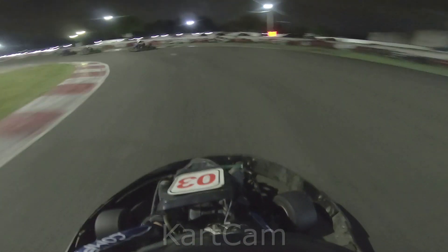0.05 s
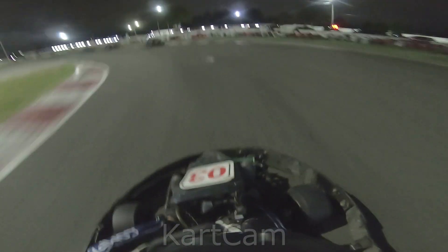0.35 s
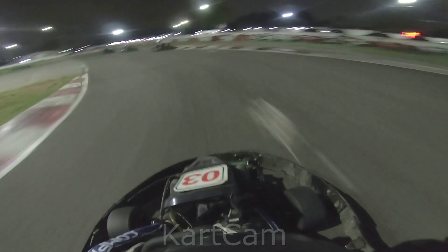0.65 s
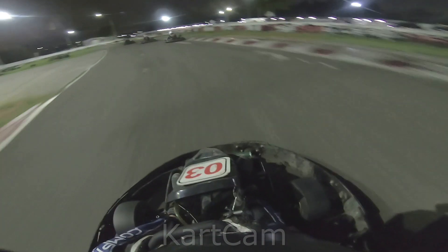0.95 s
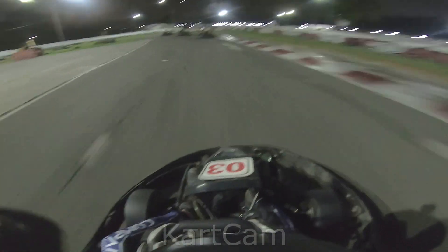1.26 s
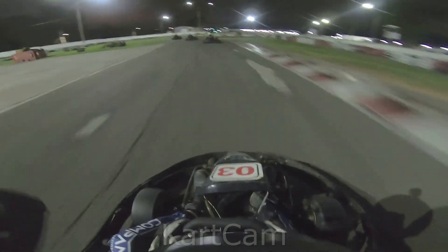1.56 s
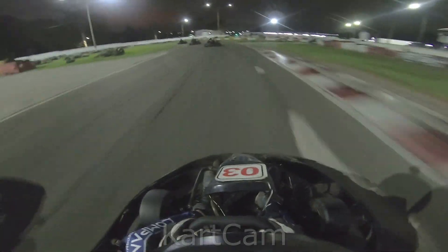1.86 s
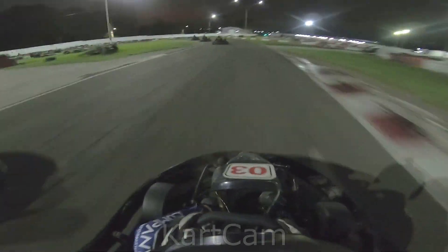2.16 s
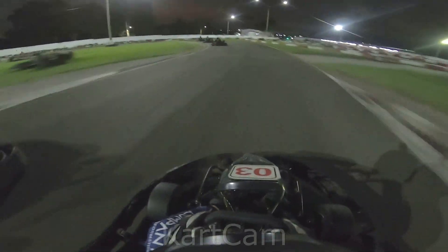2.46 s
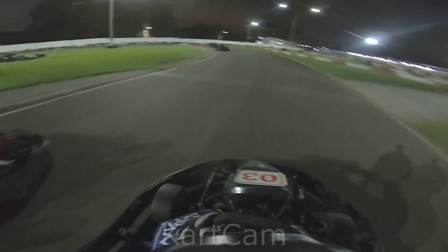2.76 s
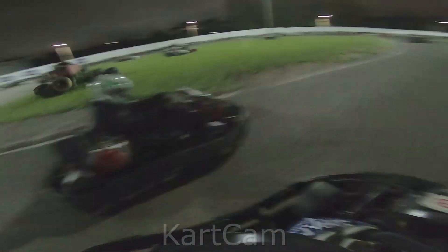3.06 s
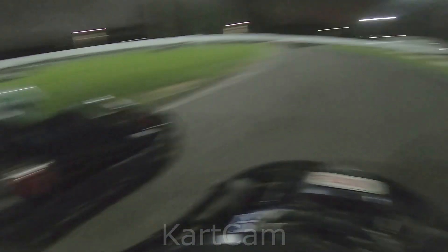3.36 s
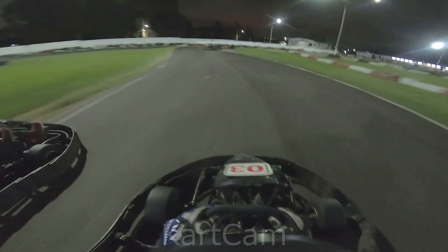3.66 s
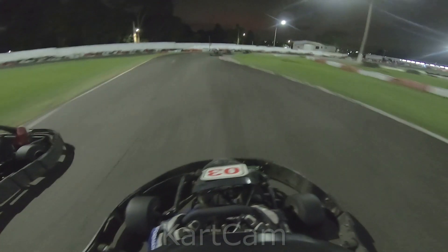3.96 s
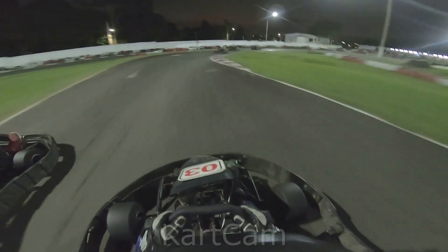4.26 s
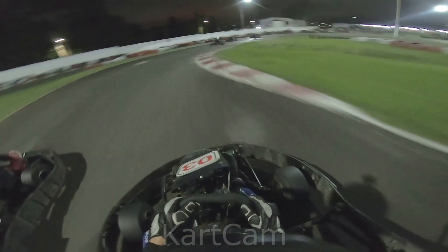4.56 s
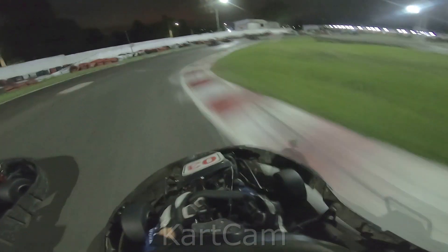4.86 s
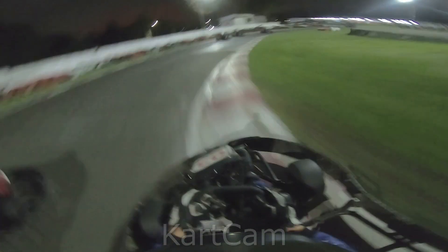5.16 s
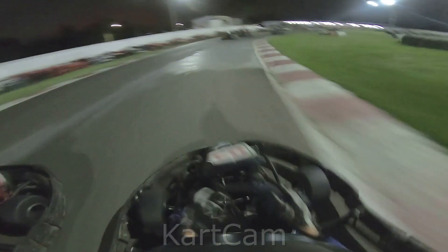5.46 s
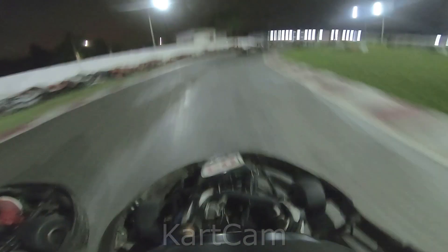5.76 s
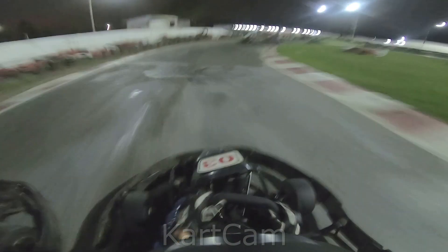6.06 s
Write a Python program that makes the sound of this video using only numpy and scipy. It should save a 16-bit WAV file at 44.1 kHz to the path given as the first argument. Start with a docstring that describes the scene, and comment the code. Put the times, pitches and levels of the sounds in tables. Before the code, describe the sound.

A go-kart's single-cylinder engine thuds and clinks at speed, slowly rising in pitch, with chain whirr and gusty wind buffeting the microphone.

```python
"""Go-kart accelerating, heard from the helmet

A four-stroke single thuds and clinks once in two crank turns round an outdoor track.
Chain and tyres whirr; the chain scrapes on its sprocket. Gusts buffet and rasp on the camera case.
Low hums swell and throb. The wind turns dull while the driver looks aside, baring the engine."""
import sys
import numpy as np
from scipy import signal
from scipy.fft import rfft, irfft
from scipy.io import wavfile
from scipy.ndimage import uniform_filter1d

SR = 44100
rng = np.random.default_rng(int(sys.argv[2]) if len(sys.argv) > 2 else 0)


def unload_audio(sound):
    """Save the sound as a 16-bit wav file, at the path given as the first command line argument."""
    columns = np.transpose(np.atleast_2d(sound))
    # keep every value between -1 and 1, then stretch to whole-number steps
    steps = np.round(np.clip(columns, -1, 1) * 32767)
    wavfile.write(sys.argv[1], SR, steps.astype(np.int16))


N = 269010
T = np.arange(N) / SR
CRUISE_HZ = 55.4  # crank rate
MAIN_RING_HZ, CASE_CUTOFF_HZ = 3100, 6150

# engine speed (time [s], crank rate [Hz])
CRANK_SPEED = [(0, 49.9), (.678, 50.65), (1.235, 50.96), (1.738, 53.21), (3.894, 61.62), (4.174, 62.0),
               (4.905, 65.2), (6.1, 67.16)]
# exhaust note (multiple of firing rate [-], relative level [dB])
EXHAUST_ORDERS = [(1, -11), (2, 0.5), (3, -7), (4, -5.5), (5, -3), (6, -7), (7, -13), (8, -11.5),
                  (9, -13.5), (10, -18.5), (11, -16), (12, -15.5), (13, -21.5), (14, -18.5), (15, -18.5),
                  (16, -22.5), (17, -16)]
# clatter at the helmet (time [s], level [dB], brightness [dB/oct])
CLATTER_AT_HELMET = [(0.1, -45, -6), (.33, -41, -9.5), (.65, -47, -12.5), (1.3, -41.5, -7), (1.55, -40, -8),
                     (2.15, -39.5, -9.5), (2.5, -44.5, -9.5), (2.9, -41.5, 0), (3.45, -40, 11),
                     (3.8, -43, 12), (4.15, -42.5, 8.5), (6.1, -43, 6)]
# valve and piston blows (place in cycle [0-1], relative level at cruise [dB],
# growth up to cruise [dB/oct], rattle decay [s], brightness [dB/oct])
CYCLE_BLOWS = [(.2, -8.5, 30, .003, 7), (.49, -1, -6, .003, 0), (.535, -2.5, -6, .003, -3),
               (.63, -7, 15, .002, 4), (.68, -4.5, 28, .003, -4)]
# modes of cylinder fins and covers (nominal frequency [Hz], width [Hz], gain [dB])
FIN_MODES = [(1130, 110, -12.5), (1850, 150, -3), (2040, 160, -9.5), (2600, 400, -2.5), (3070, 230, 18.5),
             (3310, 310, -6), (3950, 220, 5.5), (4550, 330, -8.5), (5530, 160, -2), (5880, 92, -5.5)]
# sinking ring of the clatter (time [s], pitch factor [-])
FIN_PITCH = [(1.7, 1.045), (2.7, 1.0)]
# hard knocks (time [s], level [dB], main ring [Hz], brightness [dB/oct])
HARD_KNOCKS = [(.019, -43, 3160, -1), (.06, -37, 3170, -3), (0.14, -38, 3120, -4), (.182, -35, 3350, -6),
               (0.219, -31.5, 3200, -8), (.259, -34, 3000, 0), (.458, -32.5, 3250, -2),
               (.774, -33, 3050, -7), (.976, -36, 3180, 0), (1.169, -37, 3140, 1), (1.517, -35, 3130, -8),
               (1.557, -34, 3300, -5), (1.595, -34.5, 3180, -10), (1.672, -33.5, 3120, -6),
               (1.746, -35.5, 3300, -8), (1.857, -34, 3180, -9), (2.043, -34.5, 3060, -6),
               (2.19, -34.5, 3140, -9), (2.226, -34, 3060, -7), (2.37, -39, 3020, -5),
               (2.513, -36, 3110, -5), (2.654, -37.5, 3050, -5), (2.69, -37, 3100, -3),
               (2.796, -34.5, 3120, 7), (2.866, -34, 3040, 0), (2.899, -35, 3000, -9),
               (3.002, -36.5, 3060, 4), (3.038, -40, 3020, 3), (3.14, -38, 3280, -3), (3.174, -36, 3080, 1),
               (3.309, -37, 3050, -1), (3.412, -35.5, 3070, -6), (3.443, -39, 3100, 12),
               (3.476, -35, 3080, -1), (3.543, -35, 3060, 8)]
# chain and tyre whirr (time [s], level [dB])
WHIRR_LEVEL = [(0, -33), (1.3, -33.5), (1.5, -33), (2.2, -33.5), (2.75, -36), (3.1, -36.5), (3.42, -34.5),
               (3.8, -33.5), (4.18, -35), (4.32, -28.5), (6.1, -35.5)]
# running gear and wind spectra (frequency [Hz], relative density [dB])
GEAR_SPECTRUM = [(200, 2.5), (600, -2), (1200, 7.5), (1900, 4), (2400, 2.5), (3500, 0.5), (4000, 1.5),
                 (4450, -5.5), (5000, -2.5), (5900, -11.5), (6500, -19.5), (7100, -27), (8500, -29.5),
                 (10000, -41), (11500, -62.5)]
BUFFET_SPECTRUM = [(10, -27), (25, -9.5), (45, 2), (65, 0.5), (90, 3.5), (125, 0.5), (160, -7), (260, -40),
                   (600, -65.5), (2000, -100)]
FLUTTER_SPECTRUM = [(10, -20), (32, 2.5), (65, -4.5), (130, -3), (180, 3.5), (240, -2.5), (330, -11),
                    (500, -21.5), (1200, -58), (3000, -100)]
ROAR_SPECTRUM = [(120, -30), (280, -1.5), (400, -3.5), (600, -4.5), (900, -7.5), (1400, -11.5),
                 (1900, -14.5), (2400, -20), (3200, -24), (4500, -27.5), (6000, -35), (7500, -67.5),
                 (11000, -81)]
HISS_SPECTRUM = [(900, -7.5), (1800, 2), (2700, -5), (3400, -9), (3900, -0.5), (4550, -3.5), (5200, -9),
                 (5800, -15.5), (6400, -32.5), (7000, -34), (8400, -37), (10000, -50), (11500, -53)]
# air over the case, bright head-on, dull aside (time [s], cutoff [Hz], gain [dB], extra hiss [dB])
CASE_AIRFLOW = [(0, 4910, -0.1, -0.5), (1.33, 5800, 1.6, -0.5), (1.48, 3070, -1.5, 1),
                (1.66, 2320, -2.5, 6), (1.95, 1670, 1.3, -1), (2.22, 1404, 2, 3), (2.46, 1363, -1.6, 11),
                (2.6, 742, 2, 6), (2.85, 710, -5, -9), (3.05, 758, 5.5, 6), (3.5, 1020, 0, -2),
                (3.88, 1850, -2.5, -11), (3.905, 2730, 0.5, -7), (4.22, 2870, 0, 6), (4.31, 2970, 2, 7.5),
                (4.46, 3980, 2, 1.5), (4.56, 7400, 0.8, 1.5), (5.55, 7900, 1.26, 1), (5.75, 7000, -3.5, 3),
                (6.1, 7240, 1, 2.5)]
# gusts, lulls if negative (time [s], length [s], buffet [dB], flutter [dB], rush [dB], cutoff rise [oct])
GUSTS = [(0.086, 0.071, 5, -3, 2.5, -0.087), (0.318, .25, -3.5, 1.5, 0.5, -0.26),
         (0.856, 0.15, 0.5, -0.5, -1, -0.13), (1.051, .09, -5, -4, 1, 0.052),
         (1.645, 0.062, -2, -1, 6, -0.27), (1.773, 0.035, -12, 2, 2.5, 0.32),
         (1.844, 0.046, -1, -4, -2.5, 0.69), (1.88, 0.034, 1, -4, 5, -0.14),
         (1.995, 0.05, -3, 2, -1.5, -0.64), (2.047, 0.023, -6, -14, 1, 0.38),
         (2.077, 0.026, -4, -1, 0, -.5), (2.109, 0.024, -5, -1, 1, 0.75), (2.16, 0.032, -7, -2, 0.5, 0.11),
         (2.189, .014, -2, -3, 1.5, -0.2), (2.253, 0.018, 6.5, 1.5, 3.5, 0.99),
         (2.287, 0.059, -8, -1, 0.5, 0.52), (2.369, 0.012, 4, 10, 6, .1), (2.413, 0.016, 4, 3, 5, -0.09),
         (2.459, .022, 4, 0, 4, 0.062), (2.499, 0.021, -2, 2, 2.5, .35), (2.711, 0.028, 1, 6, 11, 0.45),
         (2.865, 0.19, -4, -4, 6.5, 0.99), (3.018, 0.042, 0, 9, -1, -0.077),
         (3.143, 0.084, 1, -3, -0.5, -0.23), (3.4, 0.26, -3.5, -1.5, -0.5, -0.11),
         (3.734, 0.084, -8, 5.5, 3, 0.18), (3.856, 0.051, -9, 2, -2, -0.11),
         (3.926, 0.057, -1.5, -8, 3.5, 0.042), (4.034, 0.051, 0, -4, 0, 0.042),
         (4.144, 0.069, -3, 0.5, 3, -0.16), (4.331, 0.17, 1, 0, -1, -0.042),
         (4.516, 0.079, -1, 8.5, 0, -0.053), (4.814, 0.09, -14, 3, -1, 0), (5.047, 0.07, -5, 4, 0.5, 0.097),
         (5.2, 0.074, -3, 7.5, 0.5, 0), (5.51, 0.11, 1.5, 7, .5, 0), (5.714, 0.5, 0, -6.5, 2, 0.21),
         (5.977, 0.065, -26, 7.5, -4, -0.048)]
# chain on sprocket (time [s], length [s], frequency [Hz], level [dB])
CHAIN_SCRAPES = [(.69, .05, 4130, -41), (1.05, .05, 4300, -33), (1.482, 0.023, 4000, -33),
                 (2.35, .06, 4030, -42), (2.55, 0.3, 4400, -47.5), (2.78, 0.092, 4200, -49),
                 (3.1, .3, 4380, -44.5), (3.35, .2, 4470, -44), (3.45, .15, 4100, -42)]
# brief low hums of engine and wind (time [s], length [s], frequency [Hz], level [dB])
LOW_DRONES = [(.86, .2, 129, -21), (1.02, .12, 137, -19), (1.1, .13, 119, -20), (1.66, .12, 176, -17),
              (1.73, .14, 208, -20.5), (2.03, .17, 81, -17), (2.3, .16, 55, -20), (2.48, .16, 78.5, -18.5),
              (3.03, 0.091, 91.7, -15.5), (3.04, .09, 185.5, -23.5), (3.17, .1, 125, -19.5),
              (3.76, .3, 152.3, -20.5), (3.88, 0.24, 91, -20.5), (4.0, .1, 206, -26), (4.17, .14, 143, -22),
              (4.3, 0.16, 219, -23), (4.52, 0.17, 242, -26.5), (4.94, .14, 203, -27),
              (5.04, 0.13, 133.4, -18), (5.33, 0.098, 87, -21), (5.63, .16, 71, -16),
              (5.68, .14, 188, -29.5), (5.83, 0.16, 101, -20)]


def gain(db):
    """Decibels to amplitude."""
    return 10 ** (np.asarray(db) / 20)


def unit_rms(x):
    """Scale to rms 1."""
    return x / np.sqrt(np.mean(x ** 2) + 1e-20)


def curves(rows):
    """Table columns interpolated over time."""
    times_s, *columns = np.transpose(rows)
    return [np.interp(T, times_s, column) for column in columns]


def noise(spectrum):
    """Shaped noise, rms 1."""
    hz, db = np.transpose(spectrum)
    shape_db = np.interp(np.log(np.fft.rfftfreq(N, 1 / SR) + 1), np.log(hz), db)
    return unit_rms(irfft(rfft(rng.standard_normal(N)) * gain(shape_db), N))


def wander(rate_hz):
    """Random drift up to rate_hz, rms 1."""
    size = 2 ** 13
    hz = np.fft.rfftfreq(size, T[-1] / size)
    drift = irfft(rfft(rng.standard_normal(size)) / np.sqrt(1 + (hz / rate_hz) ** 6))
    return unit_rms(np.interp(T, np.linspace(0, T[-1], size), drift))


def steady(x, span_s):
    """Hold the running rms near 1."""
    size = max(int(span_s * SR), 8)
    return x / np.sqrt(uniform_filter1d(uniform_filter1d(x ** 2, size), size) + 1e-9)


def lowpass(x, cutoff_hz, order):
    """Zero-phase low-pass."""
    hz = np.fft.rfftfreq(N, 1 / SR)
    return irfft(rfft(x) / np.sqrt(1 + (hz / cutoff_hz) ** (2 * order)), N)


def moving_lowpass(x, cutoff_hz, order):
    """Low-pass following a cutoff curve."""
    hz, frames_s, spectra = signal.stft(x, SR, nperseg=512, noverlap=384)
    spectra = spectra / np.sqrt(1 + (hz[:, None] / np.interp(frames_s, T, cutoff_hz)) ** (2 * order))
    return signal.istft(spectra, SR, nperseg=512, noverlap=384)[1][:N]


def resonate(x, hz, width_hz):
    """Unity-gain resonance following the curve hz."""
    carrier = np.exp(2j * np.pi * np.cumsum(hz) / SR)
    pole = np.exp(-np.pi * width_hz / SR)
    return 2 * (carrier * signal.lfilter([1 - pole], [1, -pole], x / carrier + 1e-18)).real


def noise_band(hz, width_hz):
    """White noise through two equal resonances."""
    return resonate(resonate(rng.standard_normal(len(hz)), hz, width_hz), hz, width_hz)


def bell(offset_s, length_s):
    """Gaussian envelope, length_s wide at 1/e."""
    return np.exp(-(2 * offset_s / length_s) ** 2)


def swells(rows, width_hz, steady_s):
    """One swelling and dying noise band per row."""
    out = np.zeros(N)
    for time_s, length_s, hz, db in rows:
        near = abs(T - time_s) < 1.5 * length_s
        band = steady(noise_band(np.full(near.sum(), hz), width_hz), steady_s)
        out[near] += gain(db) * bell(T[near] - time_s, length_s) * band
    return out


def exhaust(cycles, gain_db, roughness):
    """Firing pulses as stacked orders, each wavering as the burn varies."""
    note = np.zeros(N)
    for order, db in EXHAUST_ORDERS:
        burn = 1 + roughness * wander(19)
        note += gain(db) * burn * np.cos(2 * np.pi * (order * cycles + rng.random()))
    return gain(gain_db) * note


def strikes(times_s, levels_db, decay_s, rattle):
    """A part strikes, then rattles briefly as it seats."""
    kicks = np.zeros(N)
    at = (times_s * SR).astype(int)
    inside = at < N - 1
    kicks[at[inside]] = gain(levels_db)[inside]
    tails = signal.lfilter([1], [1, -np.exp(-1 / (decay_s * SR))], kicks) / np.sqrt(decay_s * SR / 2)
    return kicks + rattle * tails * rng.standard_normal(N)


def blow_force(cycles, place, db, growth_db_oct, decay_s, accents_db, rattle):
    """One part strikes once a cycle, its force set by engine speed, unless a hard knock coincides."""
    count = len(accents_db)
    slack = 0.006 * rng.standard_normal(count)
    times_s = np.interp(np.arange(count) + place + slack, cycles, T)
    crank_hz = np.interp(times_s, *np.transpose(CRANK_SPEED))
    levels_db = db + accents_db + growth_db_oct * np.minimum(np.log2(crank_hz / CRUISE_HZ), 0)
    no_knock = abs(times_s[:, None] - np.transpose(HARD_KNOCKS)[0]).min(1) > 0.0035
    return strikes(times_s[no_knock], levels_db[no_knock], decay_s, rattle)


def clatter(cycles, uneven_db, rattle, pitch_drift, mode_drift_db):
    """Valves and piston ring the fins, each with its own mix of modes; the case cuts the top."""
    level_db, tilt_db_oct = curves(CLATTER_AT_HELMET)
    pitch = curves(FIN_PITCH)[0] * (1 + pitch_drift * wander(30))
    accents_db = uneven_db * rng.uniform(-1, 1, (len(CYCLE_BLOWS), int(cycles[-1]) + 1))
    blows = [(blow_force(cycles, *row, accents, rattle), bright_db_oct)
             for (*row, bright_db_oct), accents in zip(CYCLE_BLOWS, accents_db)]
    ring = np.zeros(N)
    for hz, width_hz, db in FIN_MODES:
        octaves = np.log2(hz / MAIN_RING_HZ)
        drive = sum(force * gain(bright_db_oct * octaves) for force, bright_db_oct in blows)
        mode_db = db + tilt_db_oct * octaves + mode_drift_db * wander(13)
        ring += gain(mode_db) * resonate(drive, hz * pitch, width_hz)
    return gain(level_db) * unit_rms(lowpass(ring, CASE_CUTOFF_HZ, order=12))


def running_gear(cycles, throb, ring_hz, ring_width_hz, ring_db, ring_drift):
    """Fan and tyres whirr, the chain rings as its tension drifts; all swell with each power stroke."""
    chain = resonate(noise(GEAR_SPECTRUM), ring_hz * (1 + ring_drift * wander(6.8)), ring_width_hz)
    whirr = noise(GEAR_SPECTRUM) + gain(ring_db) * unit_rms(chain)
    return gain(curves(WHIRR_LEVEL)[0]) * whirr * (1 - throb * np.cos(2 * np.pi * cycles))


def gusts():
    """Gusts swell and die; curves of (buffet [dB], flutter [dB], rush [dB], cutoff rise [oct])."""
    times_s, lengths_s, *sizes = np.transpose(GUSTS)
    grid_s = T[::32]
    bells = bell(grid_s - times_s[:, None], lengths_s[:, None])
    return [np.interp(T, grid_s, size @ bells) for size in sizes]


def rasp(cutoff_hz, slant, gain_db=-38, cutoff_share=0.92):
    """Slanting air rasps just below the airflow's cutoff."""
    centre_hz = np.minimum(cutoff_share * cutoff_hz, CASE_CUTOFF_HZ)
    band = unit_rms(noise_band(centre_hz, width_hz=1100))
    return gain(gain_db) * slant * moving_lowpass(band, cutoff_hz / cutoff_share, order=12)


def rush(eddies, cutoff_hz, slant, roar_db, hiss_db, roar_burst_db=2.0, hiss_burst_db=1.7):
    """Small eddies, shed by large ones, come in bursts of roar and hiss over the rasp."""
    bursts = unit_rms(wander(99) + 0.44 * wander(52) + 0.81 * eddies)
    # slanting air tears loose in lumps, now finer, now coarser
    lumps_db = 0.28 * slant * wander(24)
    tear_oct = 0.16 * slant * wander(22)
    cutoff_hz = cutoff_hz * 2 ** tear_oct
    roar = noise(ROAR_SPECTRUM) * gain(roar_burst_db * bursts)
    roar = steady(moving_lowpass(roar, cutoff_hz, order=1), span_s=0.029)
    hiss = unit_rms(noise(HISS_SPECTRUM) * gain(hiss_burst_db * bursts))
    hiss = moving_lowpass(hiss, cutoff_hz, order=12)
    return gain(lumps_db) * (gain(roar_db) * roar + gain(hiss_db) * hiss + rasp(cutoff_hz, slant))


def wind(buffet_db, flutter_db, roar_db, hiss_db, slant_hz=2400, slant_width_oct=0.89, lee_hz=1730):
    """Large eddies shake the case; slanting air flutters most; the rush drops in the helmet's lee."""
    cutoff_hz, flow_db, extra_hiss_db = curves(CASE_AIRFLOW)
    gust_buffet_db, gust_flutter_db, gust_rush_db, rise_oct = gusts()
    eddies = steady(noise(BUFFET_SPECTRUM), span_s=0.07)
    speed_db = 6 * np.log2(curves(CRANK_SPEED)[0] / CRUISE_HZ)
    buffet = gain(buffet_db + speed_db + gust_buffet_db) * eddies
    slant = np.exp(-(np.log2(cutoff_hz / slant_hz) / slant_width_oct) ** 2)
    slant_db = 8.5 * slant
    flutter = steady(noise(FLUTTER_SPECTRUM), span_s=0.19)
    flutter *= gain(flutter_db + flow_db + slant_db + gust_flutter_db)
    lee_db = 8 * np.minimum(np.log2(cutoff_hz / lee_hz), 0)
    rushing = rush(eddies, cutoff_hz * 2 ** rise_oct, slant, roar_db, hiss_db + extra_hiss_db)
    return buffet + flutter + gain(flow_db + lee_db + gust_rush_db) * rushing


def knocks(rattle, decay_s):
    """Each hard knock, a kick and short rattle, rings the fins at its own pitch and brightness."""
    t = np.arange(0, 0.02, 1 / SR)
    out = np.zeros(N)
    for time_s, db, ring_hz, bright_db_oct in HARD_KNOCKS:
        drive = (t == 0) + rattle * np.exp(-t / decay_s) * rng.standard_normal(len(t))
        pitch = np.full(len(t), ring_hz / MAIN_RING_HZ)
        ring = np.zeros(len(t))
        for hz, width_hz, mode_db in FIN_MODES:
            tilt_db = bright_db_oct * np.log2(hz / MAIN_RING_HZ)
            ring += gain(mode_db + tilt_db) * resonate(drive, hz * pitch, width_hz)
        out[round(time_s * SR):][:len(t)] += gain(db) * unit_rms(ring)
    return lowpass(out, CASE_CUTOFF_HZ, order=12)


def scrapes():
    """The chain scrapes and sings on its sprocket."""
    return swells(CHAIN_SCRAPES, width_hz=500, steady_s=0.023)


def drones(cycles, throb):
    """Brief low hums of engine and wind swell, throbbing with each firing."""
    return swells(LOW_DRONES, width_hz=23.5, steady_s=0.075) * (1 + throb * np.cos(2 * np.pi * cycles))


def scene():
    """Engine, running gear, wind and low drones, mono."""
    cycles = np.cumsum(curves(CRANK_SPEED)[0] / 2) / SR  # one firing in two turns
    engine = exhaust(cycles, gain_db=-22.5, roughness=0.27)
    engine += clatter(cycles, uneven_db=1.5, rattle=0.67, pitch_drift=0.016, mode_drift_db=2.6)
    engine += knocks(rattle=0.22, decay_s=0.0022)
    gear = running_gear(cycles, throb=0.12, ring_hz=4440, ring_width_hz=280, ring_db=-11, ring_drift=0.016)
    gear += scrapes()
    air = wind(buffet_db=-18.5, flutter_db=-25, roar_db=-22.5, hiss_db=-32)
    return (engine + gear + air + drones(cycles, throb=0.35))[None]


def record(dry, ceiling=0.66, fade_in_s=0.003, band_limit_hz=11400):
    """Round off peaks, fade in, band-limit."""
    excess = dry - dry / (1 + (dry / ceiling) ** 4) ** (1 / 4)
    rounded = dry - lowpass(excess[0], cutoff_hz=4300, order=6)
    rounded *= np.minimum(T / fade_in_s, 1)
    taps = signal.firwin(255, band_limit_hz, window=("kaiser", 9), fs=SR)
    return signal.oaconvolve(rounded, taps[None], "same")


dry = scene()
out = record(dry)
unload_audio(out)
```